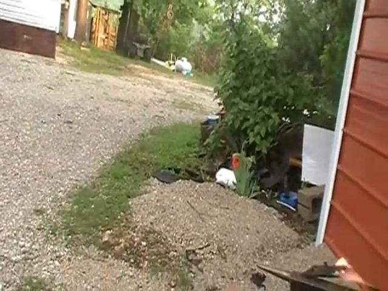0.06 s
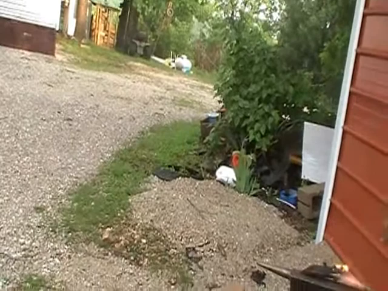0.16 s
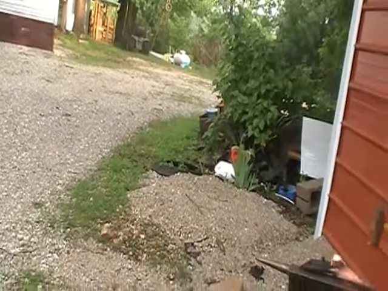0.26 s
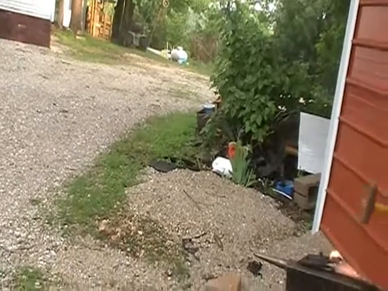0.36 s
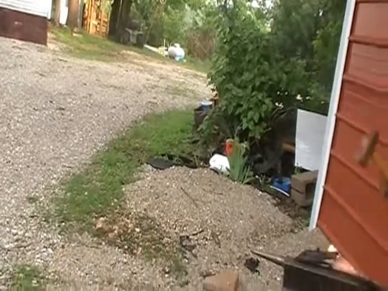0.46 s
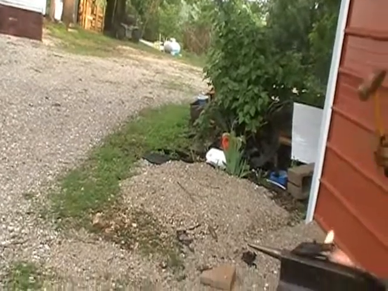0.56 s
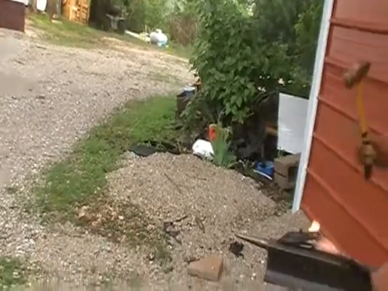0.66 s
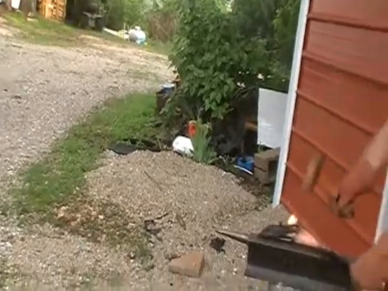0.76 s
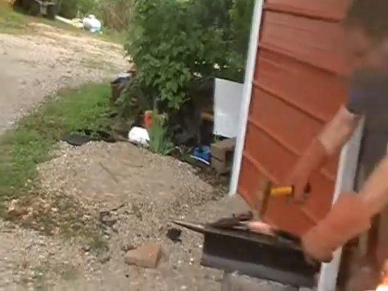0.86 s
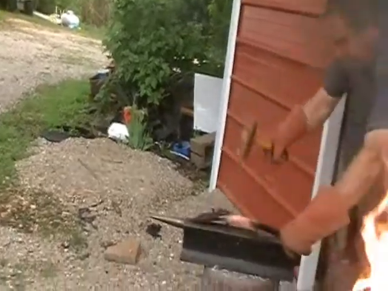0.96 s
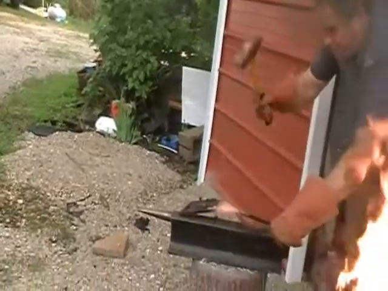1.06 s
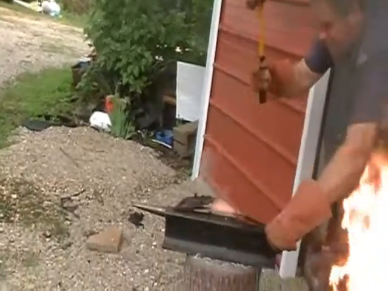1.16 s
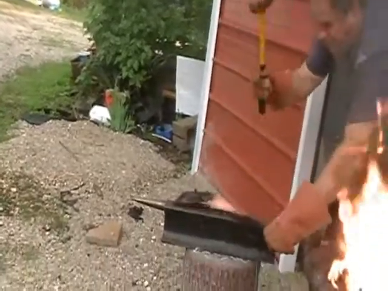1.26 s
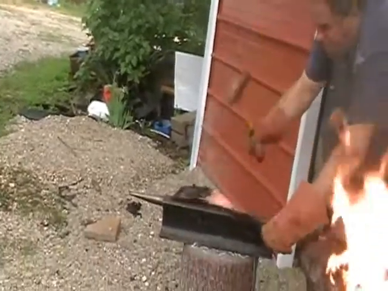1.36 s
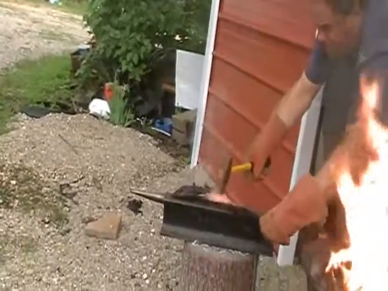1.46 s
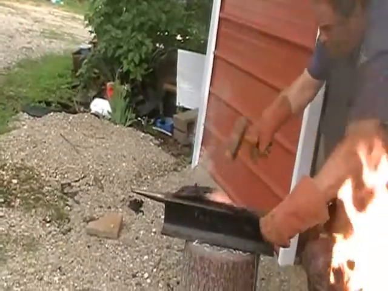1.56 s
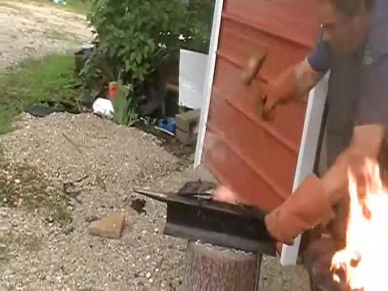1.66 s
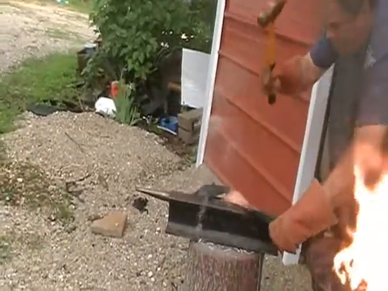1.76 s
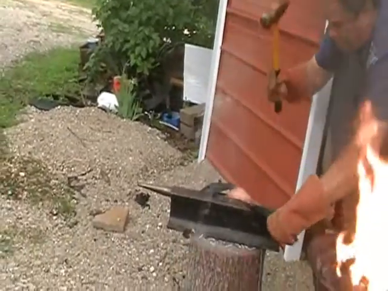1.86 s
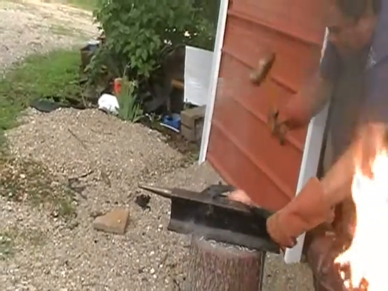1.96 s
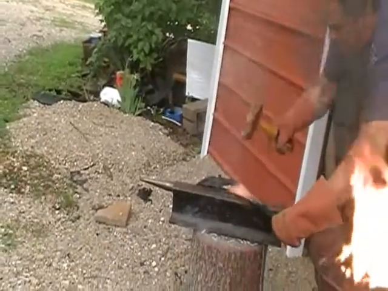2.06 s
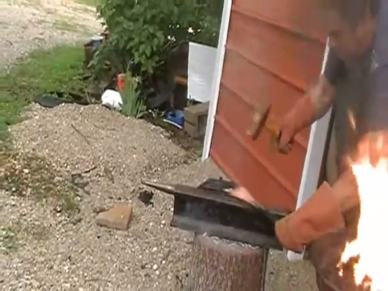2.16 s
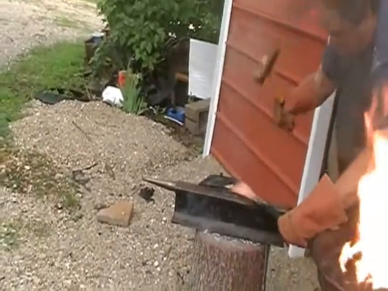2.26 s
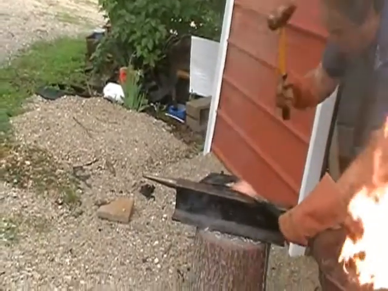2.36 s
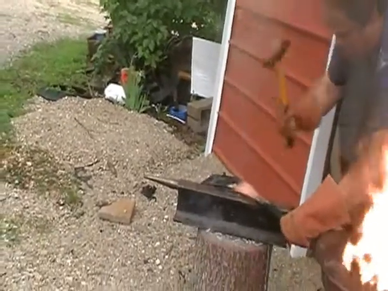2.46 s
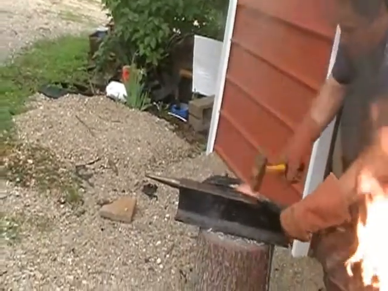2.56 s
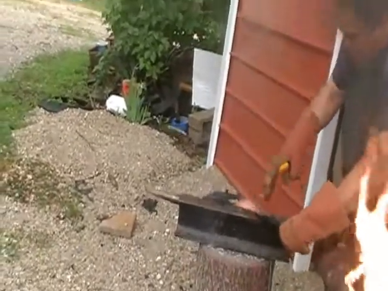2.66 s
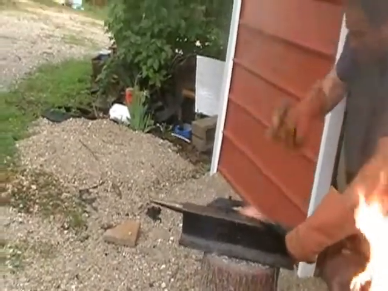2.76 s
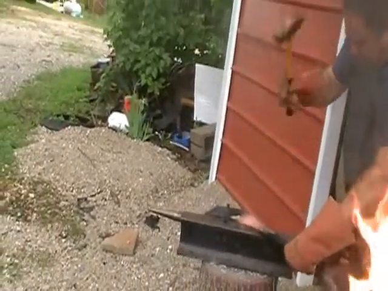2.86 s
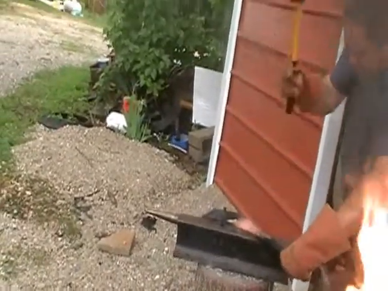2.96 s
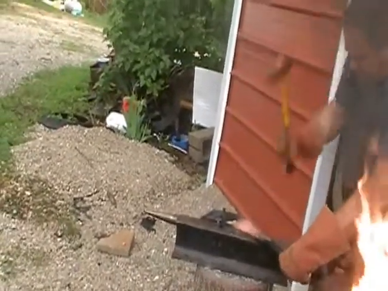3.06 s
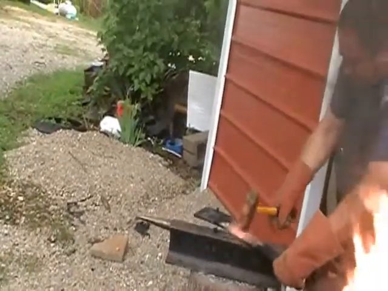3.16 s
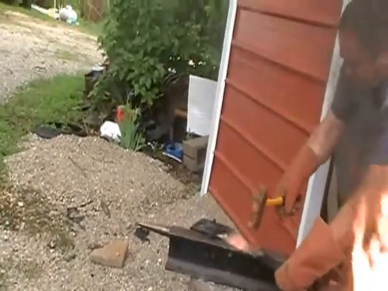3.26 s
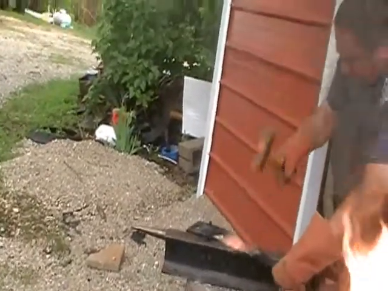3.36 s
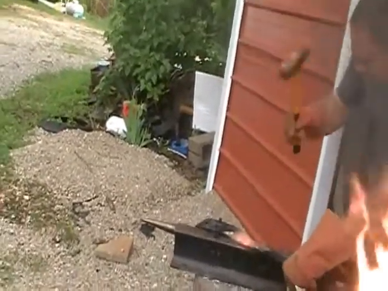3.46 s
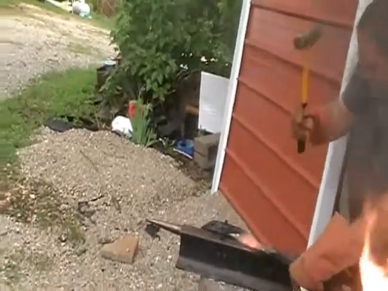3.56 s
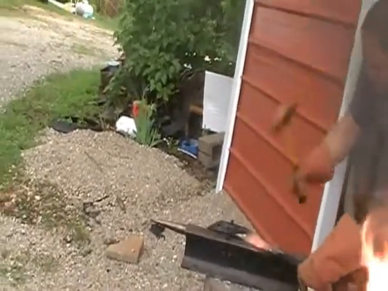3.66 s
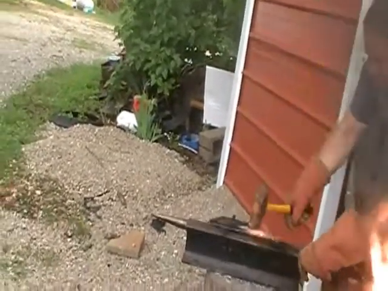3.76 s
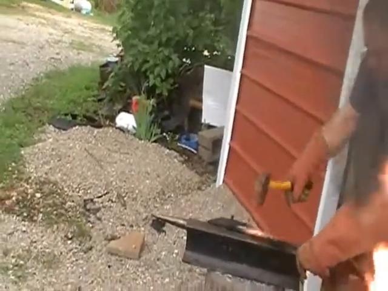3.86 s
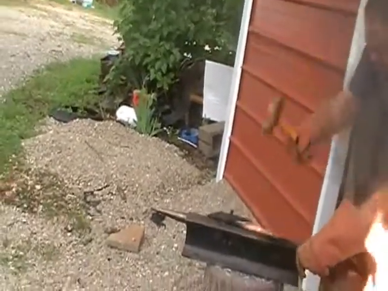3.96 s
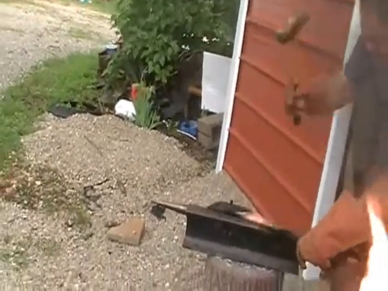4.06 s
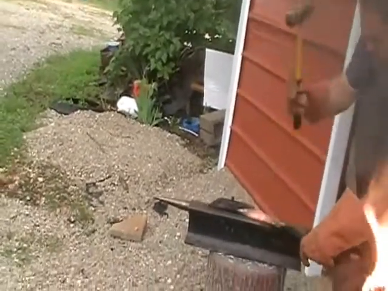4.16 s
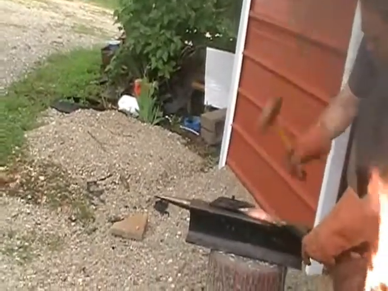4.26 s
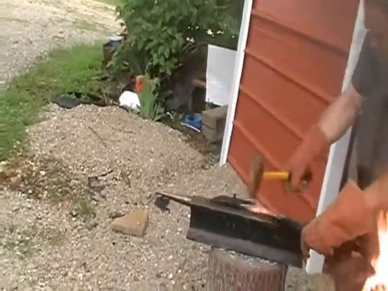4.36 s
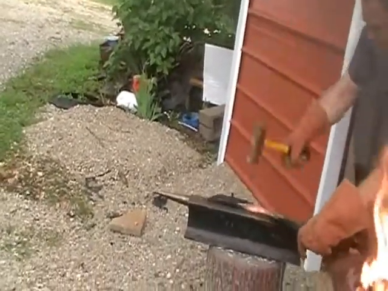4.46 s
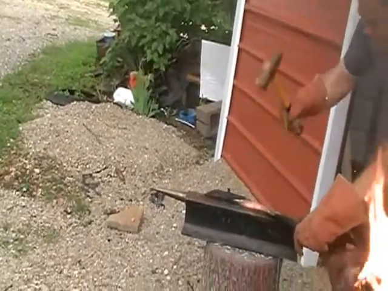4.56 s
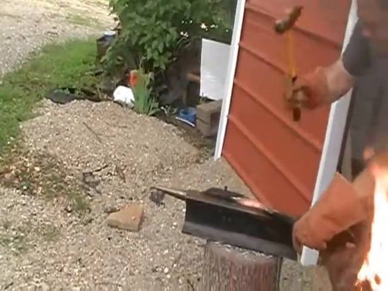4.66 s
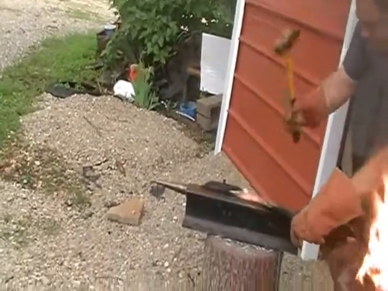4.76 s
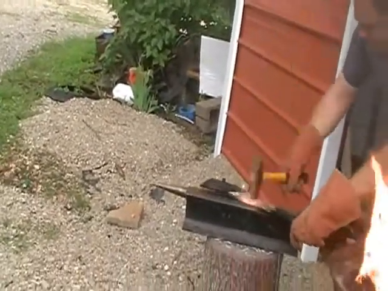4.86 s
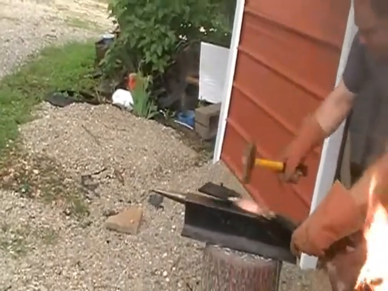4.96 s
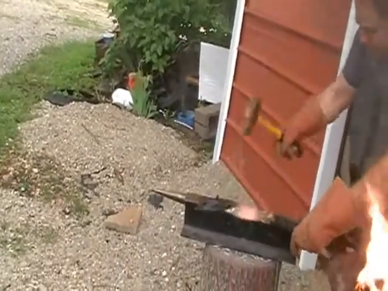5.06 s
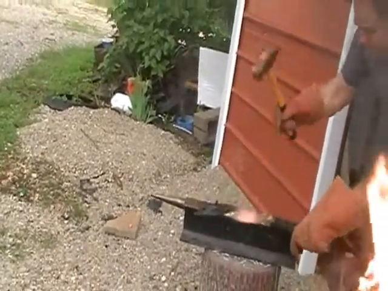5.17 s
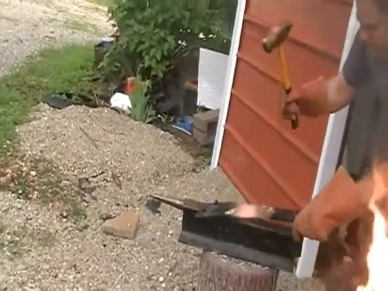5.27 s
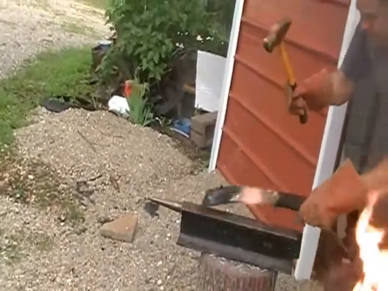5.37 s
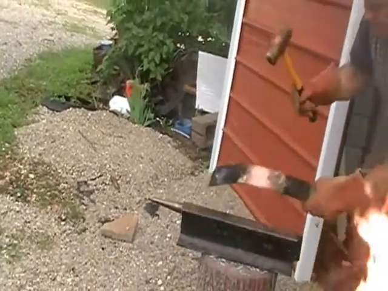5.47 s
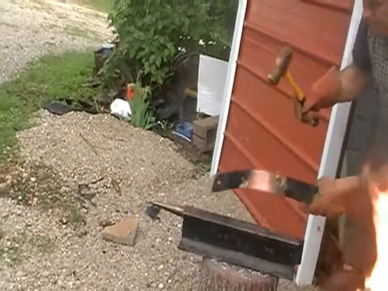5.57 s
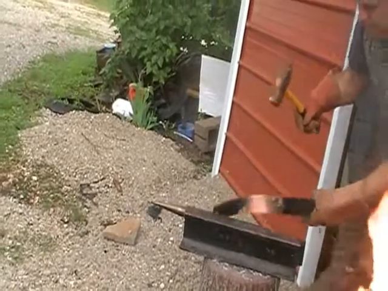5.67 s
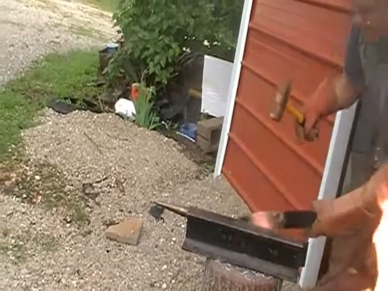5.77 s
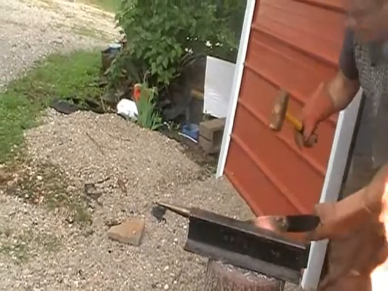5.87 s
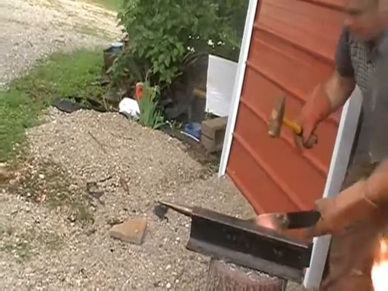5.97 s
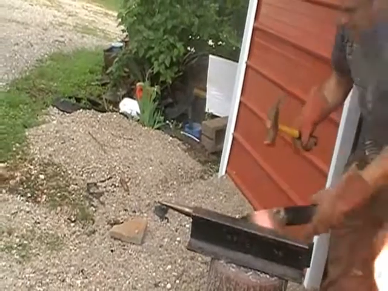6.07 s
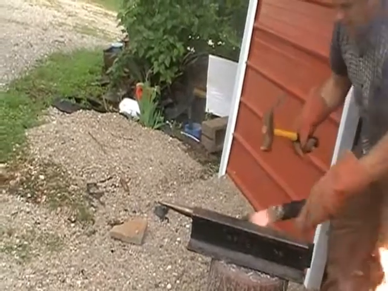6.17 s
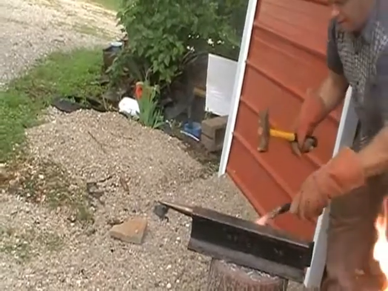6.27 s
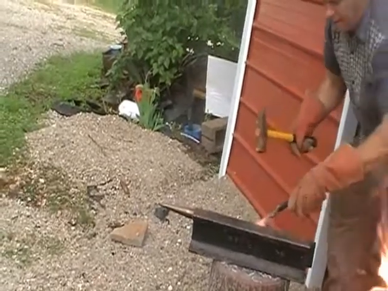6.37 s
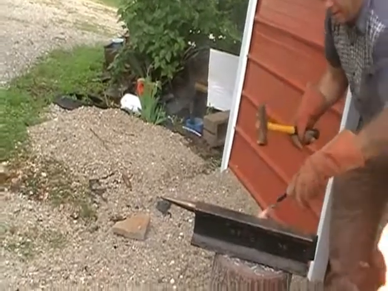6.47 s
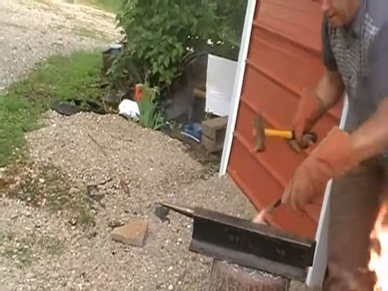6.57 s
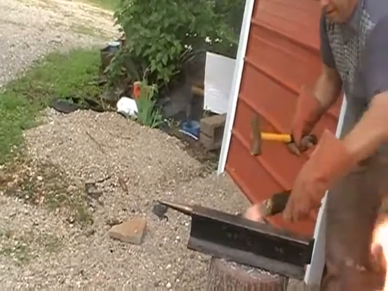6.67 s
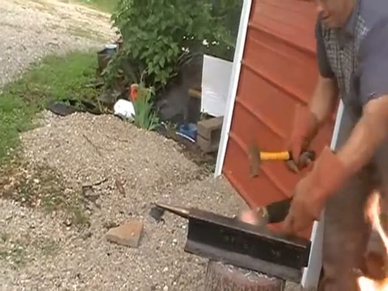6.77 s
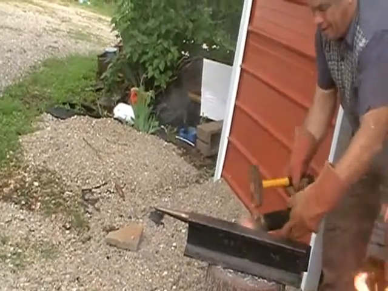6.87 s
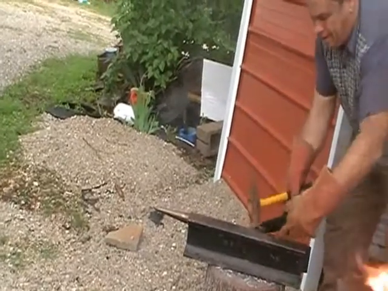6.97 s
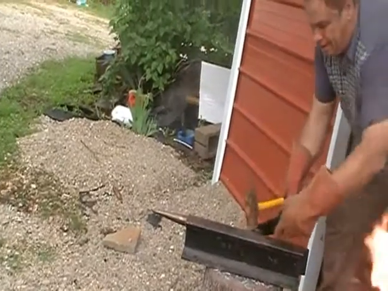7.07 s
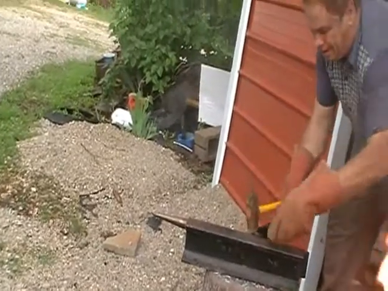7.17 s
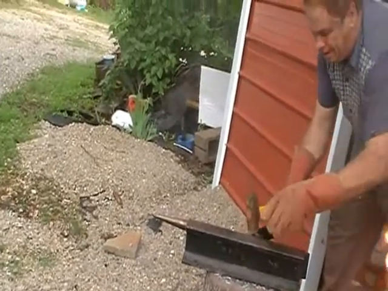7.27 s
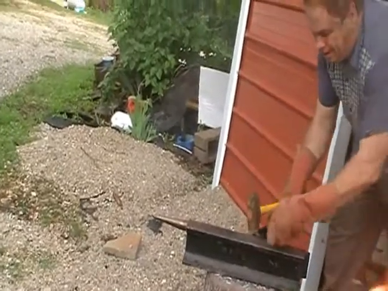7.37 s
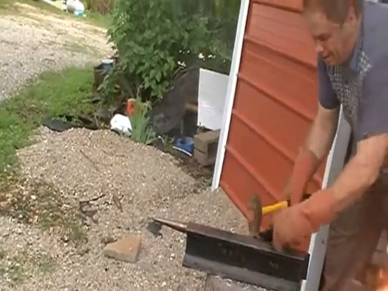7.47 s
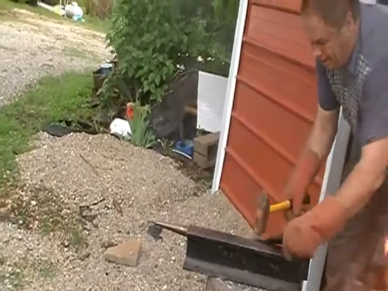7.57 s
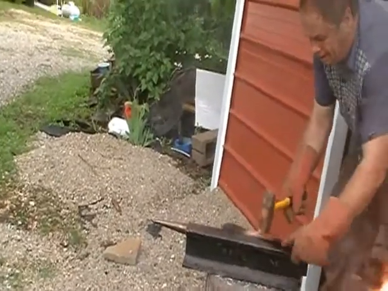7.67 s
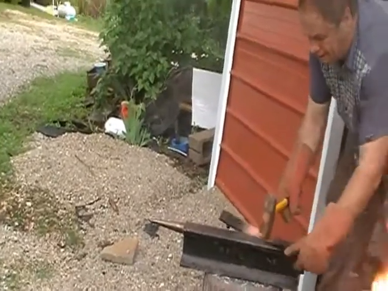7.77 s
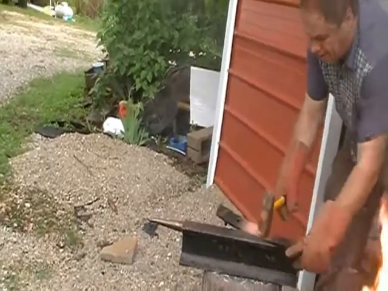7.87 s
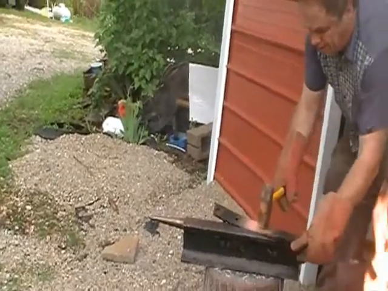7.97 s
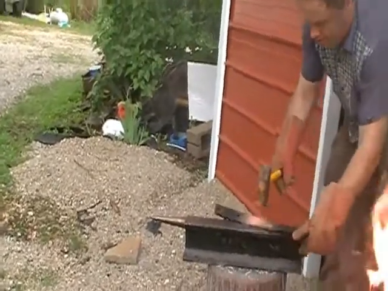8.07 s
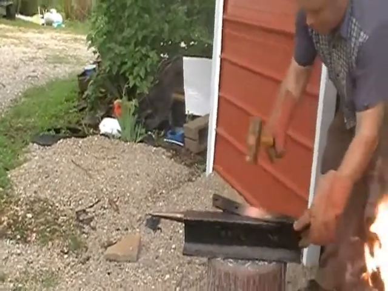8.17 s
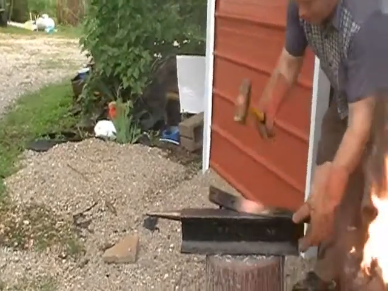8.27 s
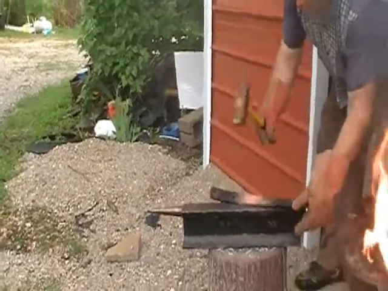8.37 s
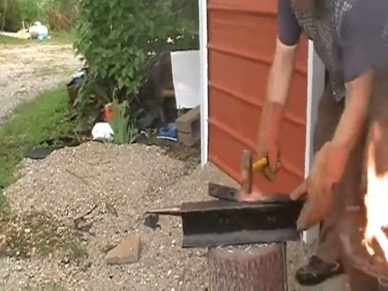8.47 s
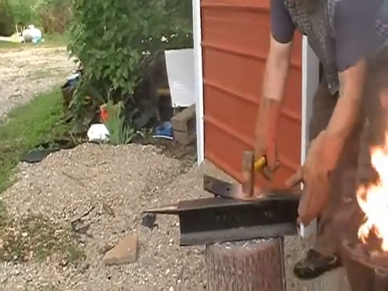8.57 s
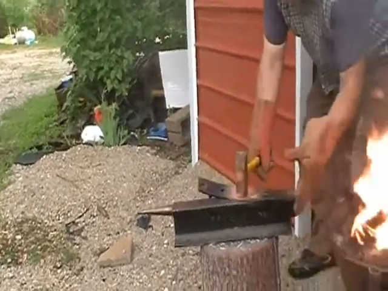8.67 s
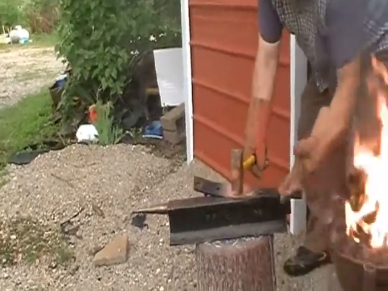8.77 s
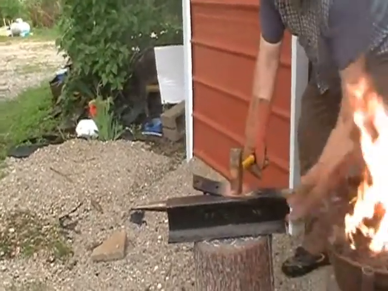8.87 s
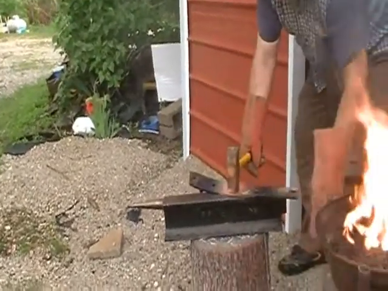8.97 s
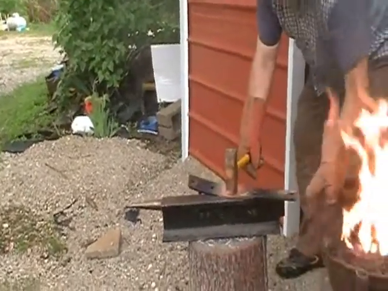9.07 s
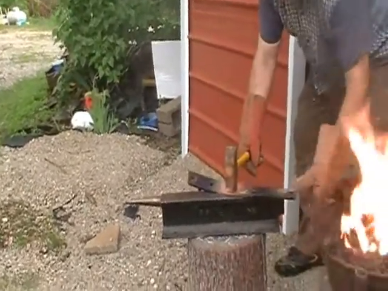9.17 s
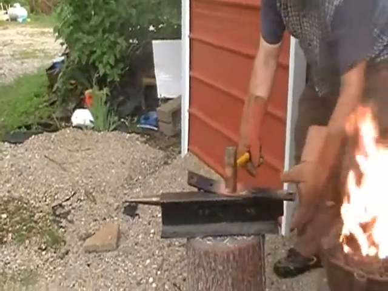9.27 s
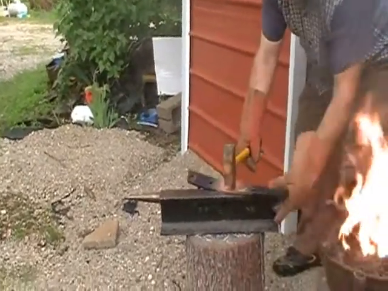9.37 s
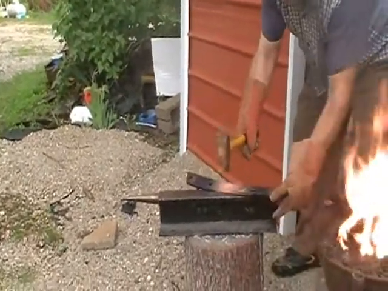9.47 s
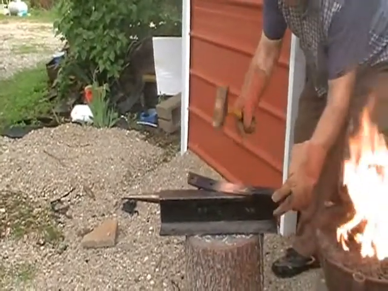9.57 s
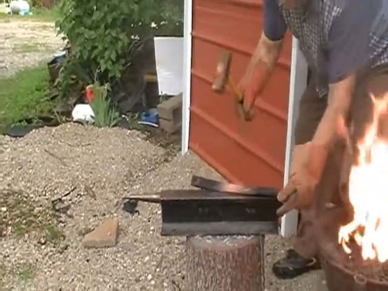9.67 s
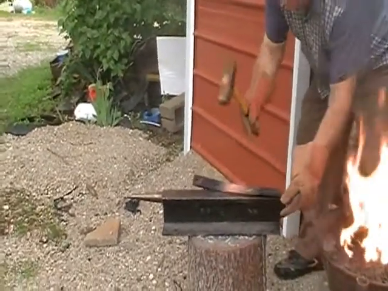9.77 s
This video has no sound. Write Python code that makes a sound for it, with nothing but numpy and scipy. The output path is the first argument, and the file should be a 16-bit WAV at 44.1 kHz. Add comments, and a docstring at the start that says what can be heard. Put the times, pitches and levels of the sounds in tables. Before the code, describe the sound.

A forge's motor blower runs outdoors from start to finish, a steady airy roar and hiss with a faint whine. After a light tap, a hand hammer strikes hot steel on a small anvil at about 0.8, 1.5 and 2.6 seconds, each blow a sharp crack with a dull thud, a brief bright ring and a short echo. The fire spits faintly between 2 and 2.6 seconds. Four harder blows land evenly at 3.2, 3.8, 4.4 and 4.9 seconds, overloading the microphone so the blower ducks and swells back. Lighter metal knocks and clanks come around 5.7 and 7 seconds as hammer and bar touch the anvil, with faint scrapes of the bar near 7.2 and 8 seconds. One last ringing blow falls at 8.5 seconds, followed at once by a small double clank. Then only the blower remains until about 10 seconds.

```python
"""Sharp, ringing hammer blows fall on hot steel over the steady roar and hiss of a forge's motor blower.
Each impact cracks, excites the modes of a small anvil, rocks it on its stump and echoes off a shed wall
and bushes outdoors. Between bursts the bar scrapes as it is shifted, the hammer is set down, the fire spits.
Each hard blow overloads the microphone's input, whose gain control ducks everything and then lets
the blower swell back."""
import sys
import numpy as np
from scipy import signal
from scipy.fft import rfft, irfft, next_fast_len
from scipy.io import wavfile
from scipy.ndimage import uniform_filter1d, minimum_filter1d, map_coordinates

SR = 44100
rng = np.random.default_rng(int(sys.argv[2]) if len(sys.argv) > 2 else 0)


def file_out(sig):
    """Save sig as 16-bit WAV at sys.argv[1]."""
    # one column per channel
    cols = np.atleast_2d(sig).T
    # limit, then scale
    lim = np.clip(cols, -1, 1)
    pcm = np.round(lim * 32767).astype(np.int16)
    wavfile.write(sys.argv[1], SR, pcm)


N = 432621
TIME = np.arange(N) / SR
IMPACT_TIME = TIME[:SR // 2]

# normal modes of the anvil: pitch_hz, level_db, t60_s
ANVIL_MODES = [(1093, -14, .28), (1276, -14, .3), (1696, -2, .22), (2003, -4, .24), (2190, -5, .15),
               (2421, 0, .24), (2536, -6, .18), (3072, 0, .41), (3416, -6, .18), (4281, -12, .2),
               (4527, -13, .3), (5102, -1, .32), (5180, -11, .18), (5453, -11, .28), (6410, -12, .2),
               (6444, -9, .3), (6944, -12, .3), (7690, -9, .22), (8086, -.5, .33), (9100, -9, .18),
               (9610, -8, .18), (10260, -4, .2), (10480, -6, .18), (10740, -7, .27), (11510, -6, .22)]
# spectrum of a contact: frequency_hz, level_db
CONTACT_SPECTRUM = [(40, -17), (250, -6.5), (450, -13), (700, 0), (1300, -4), (2400, 0.5), (3600, 0.5),
                    (5600, -2), (8300, 1.5), (12000, -4.5), (16000, -19.5)]


def hammer(thud_slope=0.43, knock_jolt_db=-1.5, clank_db=-11):
    """Impact excitation: a blow's thud grows with force and jolt; in light knocks loose steel clanks too."""
    # blows on the hot bar; jolt is low where soft steel absorbs the blow, high where it shakes the anvil:
    # start_s, force_db, tilt_db_per_octave, jolt_db, ring_db, lead_hz, second_hz
    blows = [ (0.8459, 7.5, -1.5, 1, -18.5, 5070, 6444), (1.4770, 10, -1, .5, -17.5, 5102, 8086),
             (2.6024, 11, -1.7, -4.5, -18.5, 5100, 3072), (3.1949, 21.5, 0.5, -4, -14, 2421, 3072),
             (3.7794, 16, 2.5, 2, -15, 10740, 2421), (4.3659, 18, 5, 2, -8, 5124, 11510),
             (4.9178, 16.5, 0.5, 3, -10, 10260, 8086), (8.5215, 12.5, 0, -4, -11, 5090, 2190)]
    # hammer or bar coming down lightly on the bare anvil:
    # start_s, force_db, tilt_db_per_octave, thud_db, ring_db, lead_hz, second_hz
    knocks = [ (0.188, -8.5, -3.5, -17, -26.5, 5146, 2003), (1.8108, -5.5, -7, -10, -29, 2003, 2536),
              (3.2652, -4, -3, -12, -16, 8086, 3072), (5.0750, -28, -7, -13, -26, 2421, 1696),
              (5.6991, -9, -1.5, -30, -22, 3072, 1093), (5.7560, -5, 8.5, -14.5, -26, 9100, 8086),
              (6.8510, -33, -10, -18, -50, 1696, 1093), (6.9888, -16.5, -5, -20.5, -35, 6944, 8086),
              (7.0095, -4, -16, -13, -15.5, 1696, 2190), (7.0201, -12.5, -1.5, -18, -26, 8086, 6944),
              (8.0347, -20.5, -2, -19, -38, 2003, 3072), (8.5830, -5, -2, -14, -15, 1276, 1093),
              (8.5970, -3, -1, -13, -14.5, 5102, 8086)]
    # modes of the hammer head or bar itself: pitch_hz, level_db, t60_s
    clank_modes = [(1874, 0, 0.039), (2002, -0.5, 0.065), (2220, -5, .05), (2514, -4.5, 0.082)]
    out = np.zeros(N)
    for start, force_db, tilt, jolt_db, *ringing in blows:
        thud_db = -14.5 + thud_slope * force_db + jolt_db
        add(out, start, strike(force_db, tilt, jolt_db, thud_db, *ringing))
    for start, force_db, tilt, thud_db, *ringing in knocks:
        clank = undb(force_db + clank_db) * ring(IMPACT_TIME, clank_modes, scatter_db=3.0)
        add(out, start, strike(force_db, tilt, knock_jolt_db, thud_db, *ringing) + clank)
    return out


def strike(force_db, tilt, jolt_db, thud_db, ring_db, lead_hz, second_hz):
    """Superposition: one impact is the sum of a crack, its echo, the stump's thud and the anvil's ring."""
    # modes of the anvil rocking on its stump: pitch_hz, level_db, t60_s
    stump_modes = [(400, -17, 0.079), (581, -5, 0.068), (616, -4.5, 0.11), (659.5, -1, 0.08),
                   (897, -9.5, 0.074)]
    t = IMPACT_TIME
    contact = undb(force_db) * crack(t, tilt, chatter_db=-16.5 + jolt_db)
    echo_db = -14 + 0.6 * force_db + 0.1 * max(tilt, 0) + jolt_db
    echo = undb(echo_db) * yard_echo(t, tilt)
    thud = undb(thud_db) * ring(t, stump_modes, scatter_db=2.0)
    drive_db = struck_spot(force_db, lead_hz, second_hz)
    clang = undb(ring_db) * ring(t, ANVIL_MODES, scatter_db=2.0, drive_db=drive_db)
    return contact + echo + thud + clang


def crack(t, tilt, contact_t60=0.0031, chatter_db=-14, chatter_t60=0.028, bounce_s=0.0017, bounce_db=-5):
    """A brief transient is broadband: a noise burst, its reflection off a near surface and a chatter."""
    burst = rng.standard_normal(len(t)) * fade(t, contact_t60)
    bounce = undb(bounce_db) * np.interp(t - bounce_s, t, burst, left=0)
    chatter = undb(chatter_db) * rng.standard_normal(len(t)) * fade(t, chatter_t60)
    sound = colour(burst + bounce + chatter, CONTACT_SPECTRUM, tilt)
    return sound / running_rms(sound).max()


def ring(t, modes, scatter_db, drive_db=0):
    """Free vibration is a sum of damped modes; each strike feeds them a little differently."""
    hz, db, t60 = np.transpose(modes)
    gain = undb(db + drive_db + scatter_db * rng.standard_normal(len(hz)))
    phase = 2 * np.pi * (hz[:, None] * t + rng.random((len(hz), 1)))
    onset = 1 - fade(t, 0.012)
    return gain @ (np.sin(phase) * fade(t, t60[:, None])) * onset


def struck_spot(force_db, lead_hz, second_hz, second_db=-3, others_db=-13.5, pivot_hz=4000):
    """Modal coupling in dB: the two anvil modes with an antinode at the struck spot are driven most."""
    hz = np.array(ANVIL_MODES)[:, 0]
    tilt = 0.16 * force_db  # a harder blow leans the other modes to the treble
    drive_db = others_db + tilt * np.log2(hz / pivot_hz)
    drive_db[np.argmin(abs(hz - second_hz))] = second_db
    drive_db[np.argmin(abs(hz - lead_hz))] = 0
    return drive_db


def yard_echo(t, tilt, near_t60=0.051, far_t60=0.52, far_db=-13, dulling=-0.81, lift_db=5):
    """Scattering: echoes tinged by the anvil die fast from shed and ground, slowly from far bushes."""
    tinge = [(hz, 70, lift_db) for hz, _, _ in ANVIL_MODES]
    echoes = unit_rms(colour(rng.standard_normal(len(t)), CONTACT_SPECTRUM, tilt + dulling, tinge))
    decay = fade(t, near_t60) + undb(far_db) * fade(t, far_t60)
    onset = 1 - fade(t, 0.0073)
    return 1.54 * echoes * decay * onset


def sliding_bar(grain_db=3):
    """Friction noise: flakes of scale grind under the moving bar."""
    # slides over the anvil's face: middle_s, half_length_s, level_db
    slides = [(2.513, .03, -31), (7.166, 0.035, -29), (8.03, 0.066, -29), (8.125, 0.078, -30.5)]
    # spectrum of the scraping: frequency_hz, level_db
    scrape_spectrum = [(200, -11.5), (600, 2), (1500, -8), (4000, -23), (5800, -4), (7500, -11),
                       (9600, 3.5), (11500, -2.5), (16000, -16)]
    push = sum(undb(db) * np.exp(-((TIME - middle) / half) ** 2) for middle, half, db in slides)
    friction = rng.standard_normal(N)
    roughness = unit_rms(smooth(rng.standard_normal(N), 0.0012))
    grains = friction * undb(grain_db * roughness)
    return push * unit_rms(colour(grains, scrape_spectrum))


def fire_spits(tilt_db_per_octave=6.5, echo_db=-13):
    """Impulsive sources: the fire spits small bright cracks, each followed by its echo."""
    # spits of the fire: start_s, level_db
    spits = [(2.1658, -21), (2.507, -26), (2.5507, -23)]
    out = np.zeros(N)
    for start, db in spits:
        snap = crack(IMPACT_TIME, tilt_db_per_octave)
        echo = undb(echo_db) * yard_echo(IMPACT_TIME, tilt_db_per_octave)
        add(out, start, undb(db) * (snap + echo))
    return out


def blower(air_db=-28.0, roar_hz=2400, flutter_db=0.56, swell_db=0.23, shaft_hz=330.1, wobble=0.000509):
    """Turbulence excites the pipe's resonances and flutters in the fire; the motor adds shaft harmonics."""
    # air rushing through the blower and the fire: frequency_hz, level_db
    air_spectrum = [(30, -28.5), (100, -23), (200, -17.5), (300, -8), (450, -10), (650, -3.5), (950, -5.5),
                    (1700, -1), (2050, -5.5), (2500, -15), (7300, -18.5), (10300, -12), (12500, -18.5),
                    (15700, -27)]
    # resonances of the housing and pipe: centre_hz, width_hz, lift_db
    pipe_resonances = [(395, 32, 5.5), (522.6, 16, 12.5), (612, 20, 3.5), (731, 42, 6), (824, 14, 6.5),
                       (1043, 11, 4), (1072, 15, 5), (1233, 23, 6), (1538, 59, 5), (1566, 18, 7.5),
                       (1678, 33, 5.5), (1752, 11, 5.5), (1997, 37, 4.5), (3760, 250, 8), (5860, 170, 4),
                       (9280, 430, 1.5)]
    # the motor's whine: shaft_multiple, level_db
    harmonics = [(1, -44.5), (8, -54), (9, -54), (10, -53), (13, -61), (16, -74), (19, -57.5), (20, -60.5),
                 (26, -58), (27, -63), (28, -62), (37, -56)]
    air = unit_rms(colour(rng.standard_normal(N), air_spectrum, peaks=pipe_resonances))
    roar = signal.sosfiltfilt(signal.butter(2, roar_hz, fs=SR, output="sos"), air)
    hiss = air - roar
    flow = roar * undb(flutter_db * wander(18)) + hiss
    turns = np.cumsum(shaft_hz * (1 + wobble * wander(5))) / SR
    whine = np.zeros(N)
    for multiple, db in harmonics:
        amplitude = np.sqrt(2) * undb(db + 1.6 * wander(4))
        whine += amplitude * np.sin(2 * np.pi * round(multiple) * turns)
    return undb(air_db + swell_db * wander(0.86)) * flow + whine


def colour(x, points, tilt=0, peaks=()):
    """Minimum-phase filter from (Hz, dB) points, a tilt in dB per octave and resonance peaks."""
    size = next_fast_len(len(x) + 4096, True) // 2 * 2
    f = np.maximum(np.arange(size // 2 + 1) * SR / size, 1)
    hz, db = np.transpose(points)
    # a soft contact loses only its treble, a sharp one rises from the middle up
    knee_hz = 2700 if tilt < 0 else 1300
    curve_db = np.interp(np.log(f), np.log(hz), db) + tilt * np.log2(np.maximum(f, knee_hz) / knee_hz)
    for centre, width, lift in peaks:
        curve_db += lift / (1 + (2 * (f - centre) / width) ** 2)
    cepstrum = irfft(np.log(undb(curve_db)))
    cepstrum[1:size // 2] *= 2  # folding onto positive time makes the filter causal
    cepstrum[size // 2 + 1:] = 0
    return irfft(rfft(x, size) * np.exp(rfft(cepstrum)))[:len(x)]


def undb(db):
    """Decibels to amplitude ratio."""
    return 10 ** (np.asarray(db) / 20)


def unit_rms(x):
    """Normalisation to rms 1."""
    return x / np.sqrt(np.mean(x ** 2))


def fade(t, t60):
    """Exponential decay, 60 dB down after t60 seconds."""
    return np.exp(-np.log(1000) * t / t60)


def wander(rate_hz):
    """Smooth random modulation with a spread near 1."""
    knots = rng.standard_normal(1000)
    return map_coordinates(knots, [TIME * rate_hz], order=3, mode="wrap")


def smooth(x, seconds):
    """First-order lag with the given time constant."""
    pole = np.exp(-1 / (seconds * SR))
    return signal.lfilter([1 - pole], [1, -pole], x)


def running_rms(x):
    """Envelope detection: rms over one millisecond."""
    return np.sqrt(np.abs(uniform_filter1d(x ** 2, size=44)) + 1e-12)


def add(track, start_s, sound):
    """Superpose a sound on the track."""
    i = int(start_s * SR)
    track[i:i + len(sound)] += sound[:N - i]


def scene():
    """Pressures add: anvil and forge reach one microphone."""
    return np.tile(hammer() + sliding_bar() + blower() + fire_spits(), (2, 1))


def gain_control(x, limit_db=-12, hold_s=0.12, release_db_per_s=34,
                 quick_share=0.61, quick_s=0.0014, slow_s=0.075):
    """Compression: a peak over the limit cuts the gain, part fast and part slowly; it recovers steadily."""
    excess_db = np.maximum(20 * np.log10(running_rms(x)) - limit_db, 0)
    window = 2 * int(hold_s * SR / 2) + 1
    held_db = -minimum_filter1d(-excess_db, window, origin=window // 2, mode="constant")
    release_db = release_db_per_s * TIME
    target_db = np.maximum.accumulate(held_db + release_db) - release_db
    cut_db = quick_share * smooth(target_db, quick_s) + (1 - quick_share) * smooth(target_db, slow_s)
    return x * undb(-cut_db)


def record(dry, ceiling=0.85, cutoff_hz=15850):
    """Gain control, soft saturation of the input stage and a steep low-pass; both channels are alike."""
    ducked = gain_control(dry.mean(axis=0))
    saturated = ducked / (1 + (ducked / ceiling) ** 4) ** (1 / 4)
    band_limited = signal.sosfilt(signal.ellip(10, 0.1, 75, cutoff_hz, fs=SR, output="sos"), saturated)
    return np.tile(np.clip(band_limited, -1, 1), (2, 1))


dry = scene()
out = record(dry)
file_out(out)
```